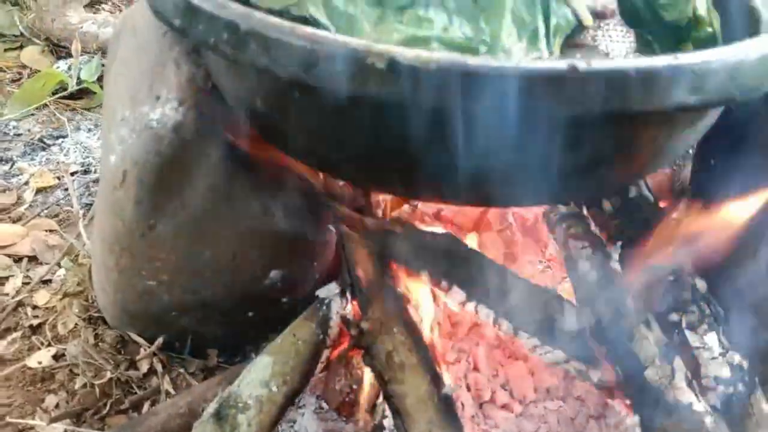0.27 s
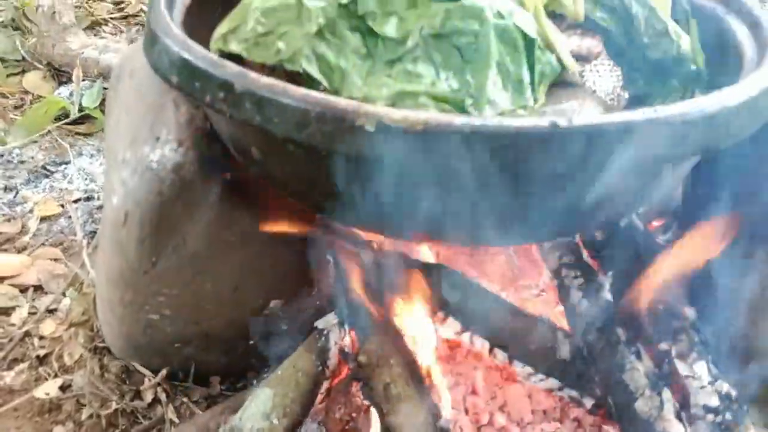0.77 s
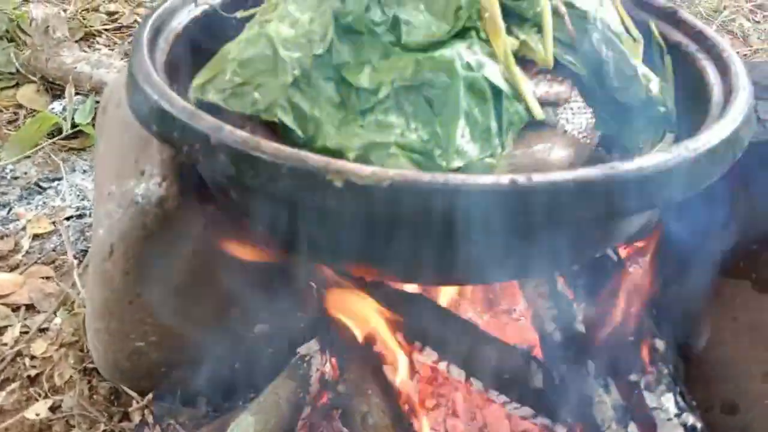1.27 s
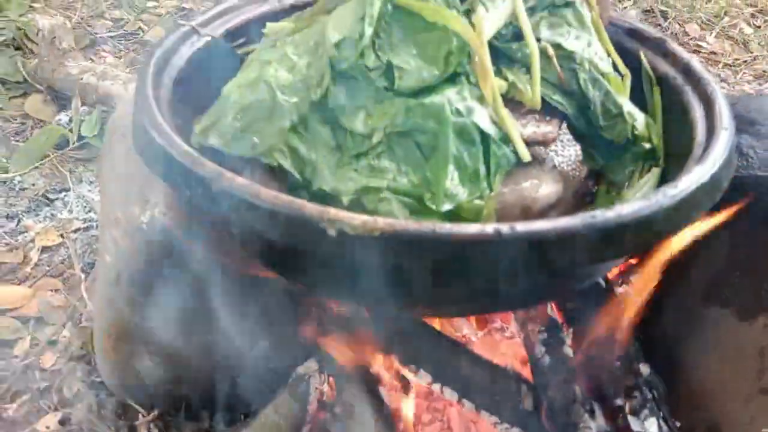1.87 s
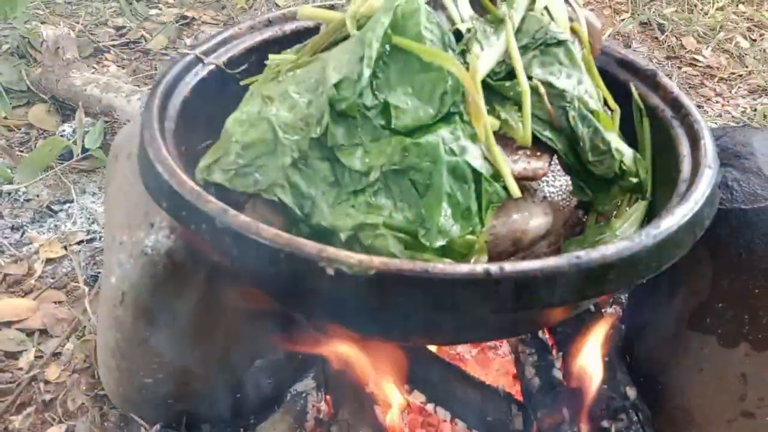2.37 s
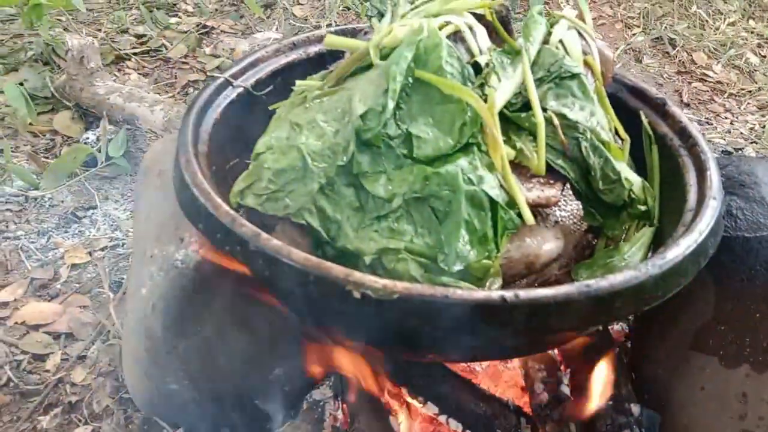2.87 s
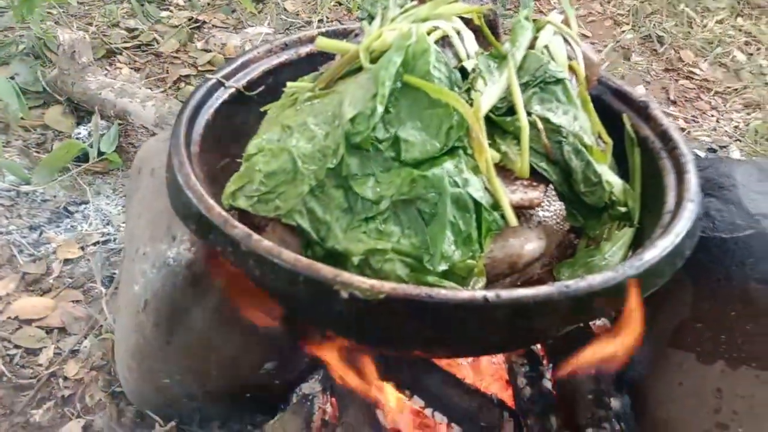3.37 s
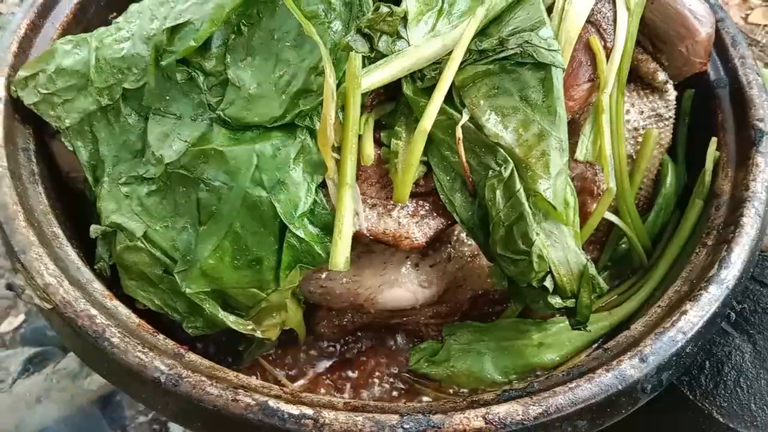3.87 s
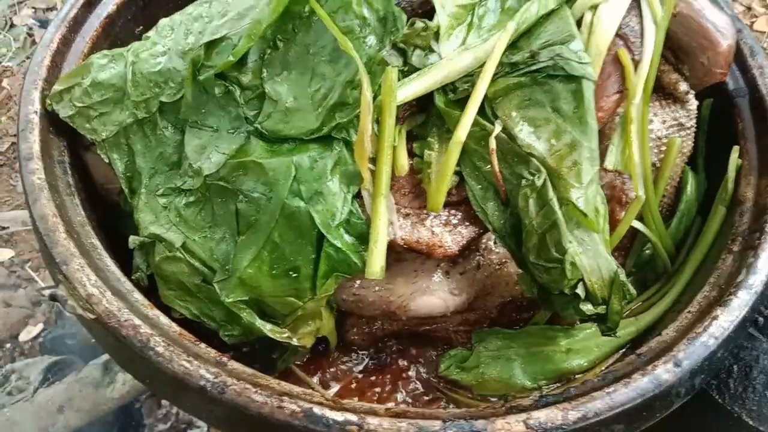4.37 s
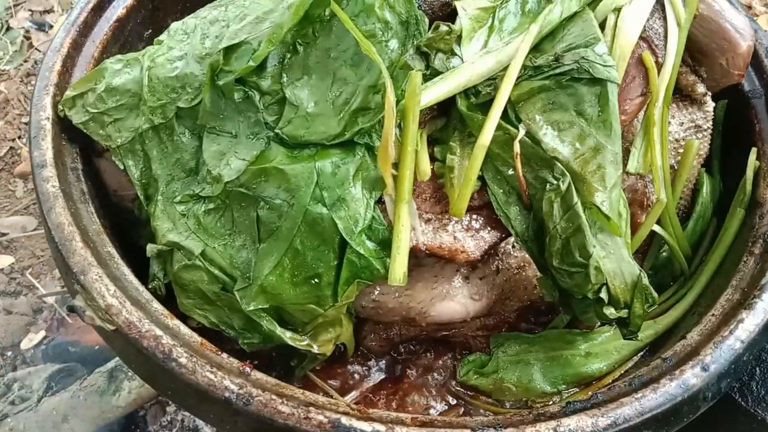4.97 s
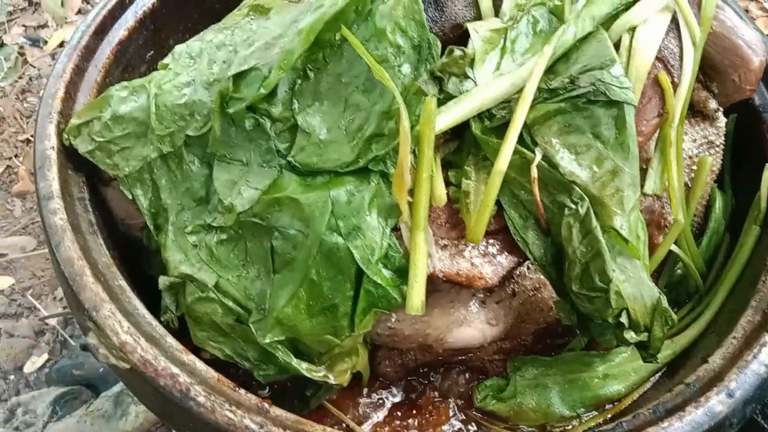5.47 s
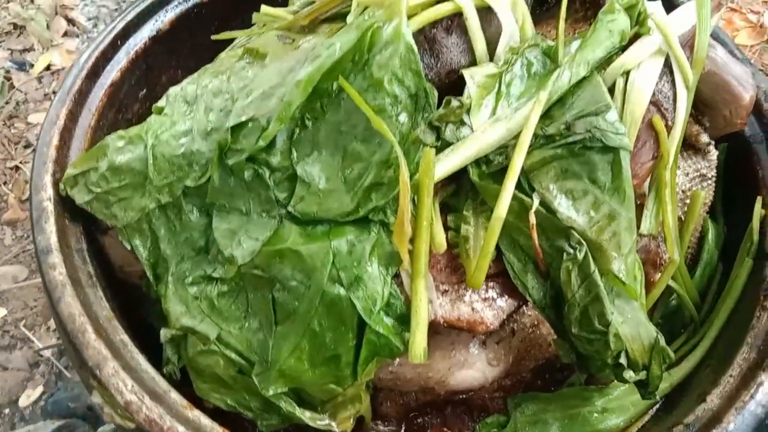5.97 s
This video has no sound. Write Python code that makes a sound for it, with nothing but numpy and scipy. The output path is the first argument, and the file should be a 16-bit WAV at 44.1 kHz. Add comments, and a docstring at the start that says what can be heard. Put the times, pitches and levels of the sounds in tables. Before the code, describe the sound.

A close microphone beside a pot on a wood fire picks up soft, resonant simmering, patchy frying hiss, tiny spits and an early dry snap. Low fire rumble swells gently. After about three and a half seconds there is a very short near-silence, then a quick fade into a stronger, steady boil and sizzle from above, with sharp cracks and wet pops in open air.

```python
"""Juice boils and fat sizzles around meat and greens in a clay pot on an outdoor wood fire.
Swarms of ringing bubbles make the boil; tiny droplet bursts over steam hiss make the sizzle.
Filtered noise gives flame rumble, a low drone and open air; short bursts give snaps, spurts, spits and gurgles.
First heard beside the pot, whose rim colours the boil, the sound breaks off for a moment.
It then fades back in from right above, louder and fuller."""
import sys
import numpy as np
from scipy import signal
from scipy.fft import rfft, irfft, next_fast_len
from scipy.io import wavfile
from scipy.ndimage import map_coordinates

SR = 44100
rng = np.random.default_rng(int(sys.argv[2]) if len(sys.argv) > 2 else 0)


def inscribe(sig):
    """Save sig as 16-bit PCM at rate SR to the path in sys.argv[1].

    A 1-D sig is mono; a 2-D sig holds one channel per row.
    Samples are clipped to [-1, 1] before scaling.
    """
    pcm = np.round(np.clip(np.atleast_2d(sig).T, -1, 1) * 32767)
    wavfile.write(sys.argv[1], SR, pcm.astype(np.int16))


N = 275184
SECONDS = np.arange(N) / SR

# Course of the heat beside the pot. Each row: time in seconds, boiling in dB, sizzling in dB, before trims.
HEAT_BESIDE = [(0.0, -52.5, -50.5), (0.42, -53.5, -51.5), (0.56, -52, -49.5), (1.08, -52, -50.5),
               (1.3, -50, -48.5), (1.66, -50.5, -48.5), (1.74, -51, -47), (1.9, -49, -47), (2.45, -49, -46),
               (2.7, -49.5, -45.5), (3.26, -48, -42.5), (3.36, -49, -48), (3.52, -49.5, -45)]
# The juice wells up beside the pot. Each row: centre in seconds, lift in dB, half-length in seconds.
WELLINGS = [(0.332, 2, 0.048), (0.653, 1, 0.063), (1.19, 2.5, 0.016), (1.527, 3, 0.011), (1.766, 2, 0.042),
            (2.566, 2.5, 0.035), (3.066, 2, 0.038)]
# Main pot resonances past the rim. Each row: centre in Hz, half-width in Hz, level in dB.
POT_RESONANCES = [(870, 126, 0.5), (1481, 108, -1), (1637, 122, -1.5), (1976, 147, -4.5), (2270, 114, -8)]
# Weak resonance that speaks now and then. Each row: centre in Hz, half-width in Hz, level in dB.
FITFUL_RESONANCE = [(1115, 175, 0)]
# High resonances rung by the smallest bubbles. Each row: centre in Hz, half-width in Hz, level in dB.
HIGH_RESONANCES = [(2470, 200, -6), (2820, 170, 0), (3290, 160, 0)]
# Bubbles of one size pause. Each row: centre in seconds, dip in dB, half-length in seconds, from Hz, to Hz.
LULLS = [(0.03, -5, .04, 300, 1000), (0.185, -7, 0.03, 300, 1500), (0.46, -6, 0.05, 1030, 1450),
         (0.692, -6, 0.03, 300, 1200), (0.9, -6, 0.055, 1030, 1450), (1.11, -4, 0.025, 300, 2300),
         (1.45, -4, .025, 300, 1400), (1.622, -8, 0.03, 300, 1400), (1.98, -5, .03, 1030, 1450),
         (2.345, -4, 0.018, 300, 1100), (2.41, -11, .045, 1030, 1420), (2.625, -6, .03, 1000, 1400),
         (2.8, -4, 0.07, 300, 1000), (3.29, -9, 0.026, 300, 1400), (4.963, -12, 0.034, 200, 680),
         (5.145, -12, 0.047, 200, 650), (5.555, -13, 0.037, 200, 620)]
# Colour of the fat heard beside the pot. Each row: frequency in Hz, relative density in dB per Hz.
FAT_BESIDE = [(1880, -24), (3200, -14), (3490, -12), (4280, -5), (4720, -12.5), (5380, -3.5), (6060, -5.5),
              (7340, 1.5), (7740, 3.5), (8710, -3), (9360, -11.5), (10600, -5.5), (11500, -10),
              (12700, -11), (13900, -22.5), (15400, -18.5)]
# Flame rumble beside the pot. Each row: time in seconds, level in dB.
FLAME_BESIDE = [(0.05, -81), (0.92, -75.5), (1.2, -74), (1.85, -74), (2.05, -76), (2.6, -75), (2.85, -70.5),
                (3.27, -66.5), (3.45, -78)]
# Flares heard from above. Each row: start in seconds, length in seconds, level in dB.
FLARES = [(3.89, 1.31, -55.5), (5.33, 0.11, -53.5), (5.53, 0.33, -56), (5.92, 0.25, -61)]
# Colour of the flames. Each row: frequency in Hz, relative density in dB per Hz.
FLAME_COLOUR = [(32, -33), (55, -23), (64, -11), (97, 4.5), (125, 4.5), (147, 0), (243, -20), (330, -42),
                (430, -26), (730, -120)]
# Swells of the low drone. Each row: start in seconds, length in seconds, level in dB before a 1 dB lift.
DRONE_SWELLS = [(0.72, 0.28, -79), (1.015, 0.55, -62.5), (1.57, 0.25, -68), (1.84, 0.092, -63.5),
                (2.08, 0.075, -67.5), (3.796, 0.36, -62), (4.19, 0.25, -75), (4.486, 0.76, -61.5),
                (5.352, 0.094, -69), (5.595, 0.58, -60)]
# Colour of the drone. Each row: frequency in Hz, relative density in dB per Hz.
DRONE_COLOUR = [(20, -32), (36, -24), (44.5, -2), (54, -16), (85, -13), (125, -25), (300, -69)]
# Colour of the outdoor air. Each row: frequency in Hz, relative density in dB per Hz.
AIR_COLOUR = [(30, -3), (120, 4.5), (300, 0.5), (600, -2.5), (2000, -27), (15000, -16)]
# Wood snaps. Each row: start in seconds, nominal level in dB, ring in Hz, ring and crack t60 in seconds,
# relative crack level in dB.
SNAPS = [(0.036, -47, 4400, 0.024, -2), (0.1526, -29.5, 3640, 0.0062, -13), (0.1526, -42, 2300, 0.005, -9),
         (1.584, -43, 4360, 0.0051, 2), (2.071, -52, 2450, 0.025, 7), (2.548, -37, 5600, 0.0055, -4.5),
         (4.8663, -19, 4320, 0.0086, -8), (4.8668, -21, 7460, 0.0068, -3), (4.8675, -22, 1600, 0.0045, -2),
         (4.8688, -23, 1770, 0.0054, 3), (5.086, -36, 2380, 0.012, 4), (5.345, -24, 6000, 0.005, -11),
         (5.37, -36, 1880, 0.016, 0), (6.035, -21.5, 1800, 0.0044, -3)]
# Juice flashes to steam. Each row: centre in seconds, level in dB, half-length in seconds.
SPURTS = [(0.036, -52, .008), (0.145, -52, .018), (0.335, -49.5, 0.04), (0.508, -59, .015),
          (0.58, -50.5, 0.016), (0.732, -42.5, 0.0075), (0.964, -60, .03), (1.225, -50, 0.044),
          (1.394, -49, .012), (1.525, -45.5, 0.011), (1.77, -51, 0.018), (2.026, -47, 0.037),
          (2.118, -47, 0.023), (2.362, -44.5, 0.03), (2.535, -46.5, 0.032), (2.7, -48, 0.011),
          (2.834, -49, 0.058), (3.22, -42.5, 0.024), (3.535, -46, 0.033), (4.48, -51, .01),
          (4.565, -49, 0.0087), (4.78, -41, 0.028), (5.167, -38, 0.022), (5.534, -36, 0.013),
          (5.712, -38, 0.012), (5.932, -36.5, 0.036)]
# Larger drops spit in the fat. Each row: start in seconds, nominal dB with the energy spread over one ms.
SPITS = [(0.153, -45), (0.2897, -42), (0.3102, -42), (0.4983, -49), (0.732, -45), (0.826, -48),
         (1.4716, -43), (1.5234, -47), (1.6062, -45), (1.7998, -42), (1.8588, -37), (2.1121, -41),
         (2.177, -40), (2.2687, -46), (2.3341, -38), (2.465, -37), (2.5037, -40), (2.5466, -38),
         (2.6898, -44), (2.9527, -46), (3.1966, -38), (3.2103, -35), (4.039, -27), (4.1304, -31),
         (4.4218, -24), (4.4788, -40), (4.5631, -34), (4.8676, -27), (5.0056, -28), (5.038, -34),
         (5.179, -27), (5.3438, -36), (5.7105, -28), (6.0492, -31)]
# Clusters of big bubbles. Each row: centre in seconds, relative level in dB, pitch in Hz, half-spread in seconds.
GURGLES = [(0.562, -54, 623, 0.031), (0.95, -52, 695, 0.02), (1.187, -54, 644, 0.017),
           (1.59, -58, 500, .015), (1.739, -40, 800, 0.024), (1.752, -40, 1200, 0.016),
           (2.111, -55, 537, 0.028), (2.465, -50.5, 557, 0.025), (2.70, -56, 680, 0.039),
           (2.888, -51, 650, .02), (2.983, -50.5, 600, 0.035), (3.43, -55, 586, 0.053),
           (4.408, -24, 1390, 0.0048), (4.411, -48.5, 380, 0.0084), (5.371, -29, 1430, 0.0079),
           (5.371, -38.5, 455, 0.0066), (5.402, -52, 334, 0.0184), (5.44, -43.5, 450, 0.035),
           (6.035, -45.5, 443, 0.0099)]
# Single blisters pop. Each row: start in seconds, nominal level in dB, starting pitch in Hz.
POPS = [(4.405, -17.5, 940), (5.238, -24, 1200), (5.3679, -20, 900), (5.372, -21, 1400)]
# Colour of the juice heard from above. Each row: frequency in Hz, relative density in dB per Hz.
JUICE_ABOVE = [(190, -65), (330, -33), (398, -25.5), (515, -2), (650, 1), (780, -2), (930, 2), (1090, 0.5),
               (1250, 2.5), (1390, -2), (1600, 2), (1780, -3), (1900, -3.5), (2190, -6), (2550, -17.5),
               (3320, -47), (5610, -120)]
# Colour of the fat heard from above. Each row: frequency in Hz, relative density in dB per Hz.
FAT_ABOVE = [(1880, -28.5), (3150, -17), (3600, -6.5), (4250, -7), (4430, -5.5), (4800, -14), (5420, -4.5),
             (6310, -6.5), (7650, 2), (8050, -0.5), (9300, -13), (10800, -8), (11500, -13.5), (12800, -13),
             (13900, -24.5), (15400, -21)]

BREAK_S, RETURN_S, TOP_HZ = 3.545, 3.595, 15530
GAP_DB = -93  # faint hiss under everything, including the break
BESIDE_BOIL_TRIM_DB, BESIDE_SIZZLE_TRIM_DB = 0.07, -0.88
WELLING_SIZZLE_SHARE = 0.31  # part of the welling lift that the sizzle follows
SIMMER_BRIGHT_DB = -13  # smallest bubbles against the rest, at the hardest boil
BRIGHTEN, BRIGHT_ABOVE_HZ = 0.52, 2000  # extra dB of upper resonances per dB of boiling
FITFUL_DB, FITFUL_SWING_DB, FITFUL_GROWS = -8.5, 2, 0.68  # level, random swing, extra dB per dB of boiling
WANDER_SHARE, WANDER_RATE = 0.0087, 5  # drift as a share of the pitch; random knots a second
FLARE_ATTACK_S, FLARE_RELEASE_S, FLAME_LULL_DB = 0.08, 0.056, -69.5
DRONE_ATTACK_S, DRONE_RELEASE_S, DRONE_LULL_DB = 0.04, 0.059, -100
SNAP_LOW_RATIO, SNAP_TOP_RATIO = 0.76, 1.3  # snap band around its ring, so low-ringing splinters sound duller
SPIT_T60_S, POP_CYCLES = 0.0071, 6.4
ABOVE_BOIL_DB, ABOVE_SIZZLE_DB = -39.5, -39.5  # base levels at the return
BOIL_RISE_DB_PER_S, SIZZLE_RISE_DB_PER_S = 0.21, 1.18
BOIL_RETURN_DB, BOIL_RETURN_S = -2, 0.45  # the boil comes back more slowly than the sizzle


def amp(db):
    """Decibels to gain."""
    return 10 ** (np.asarray(db) / 20)


def unit(x):
    """Scale to rms 1."""
    return x / np.sqrt(np.mean(x ** 2) + 1e-20)


def noise():
    """White noise for the whole scene."""
    return rng.standard_normal(N)


def curves(rows):
    """One value per sample for each column after the time."""
    s, *columns = np.transpose(rows)
    return [np.interp(SECONDS, s, column) for column in columns]


def bump(centre, length):
    """Bell-shaped swell that reaches 1 at its centre."""
    return np.exp(-((SECONDS - centre) / length) ** 2)


def wobble(rate):
    """Smooth random curve with rate knots a second."""
    at = np.arange(N) * rate / SR
    coarse = at[::16]
    knots = rng.standard_normal(int(at[-1]) + 4)
    return np.interp(at, coarse, map_coordinates(knots, [coarse]))


def highpassed(x, order, hz, sosfilter):
    """Keep what lies above hz, using the given filter routine."""
    return sosfilter(signal.butter(order, hz, "highpass", fs=SR, output="sos"), x)


def coloured(x, points):
    """Shape x with a causal (minimum-phase) filter through the (Hz, dB) points, at rms 1."""
    size = 16384
    hz, db = np.transpose(points)
    bins = np.fft.rfftfreq(size, 1 / SR)
    shape = amp(np.interp(np.log(bins + 1), np.log(hz + 1), db))
    cepstrum = irfft(np.log(np.maximum(shape, 1e-5)))[:size // 2]
    cepstrum[1:] *= 2
    response = irfft(np.exp(rfft(cepstrum, size)))[:size // 2]
    return unit(signal.oaconvolve(x, response)[:N])


def add(track, s, sound):
    """Mix a sound into the track at time s."""
    start = max(round(s * SR), 0)
    track[start:start + len(sound)] += sound[:N - start]


def bursts(rate, spread_db):
    """Tiny pops at random moments, of scattered size, at rms 1."""
    chance, size, sign = rng.random(N), rng.standard_normal(N), rng.choice([-1, 1], N)
    return unit((chance < rate / SR) * sign * amp(spread_db * np.minimum(size, 2.5)))


def bubble(t, hz, cycles, rise):
    """A bubble rings down 60 dB over some cycles; its pitch rises as it reaches the surface."""
    age = t * hz / cycles
    ring = np.sin(2 * np.pi * hz * t * (1 + rise * age))
    onset = 1 - np.exp(-2 * t * hz)
    return ring * amp(-60 * age) * onset


def boiling(rate, spread_db, cycles, froth_db):
    """A swarm of ringing bubbles on a froth of small pops."""
    count = int(rate * N / SR)
    when, pitch, size = rng.random((count, 3)).T
    t = np.arange(SR // 50) / SR
    hz = 520 * 5 ** pitch[:, None]
    rings = bubble(t, hz, cycles, rise=0.11) * hz * amp(spread_db * size[:, None])
    at = (when * N).astype(int)[:, None] + np.arange(len(t))
    swarm = unit(np.bincount(at.ravel(), rings.ravel(), N)[:N])
    return swarm + amp(froth_db) * bursts(rate=4000, spread_db=0.0)


def sizzling(rate, spread_db, steam_db, clump_db, flutter_db):
    """Droplets burst in the hot fat, in clumps, over a smooth hiss of steam."""
    droplets = bursts(rate, spread_db) * amp(clump_db * wobble(260))
    steam = amp(steam_db) * noise()
    return (droplets + steam) * amp(flutter_db * wobble(45))


def patchy(x, depth_db, rate, width_hz, fade_hz):
    """Like-sized bubbles come and go in pockets: narrow bands swell and fade, ever less above fade_hz."""
    hz, t, z = signal.stft(x, SR, nperseg=1024)
    knots = rng.standard_normal((240, 200))
    grid = np.meshgrid(hz / width_hz, t * rate, indexing="ij")
    field = map_coordinates(knots, grid, order=2, mode="mirror")
    swell = np.minimum(field, 1)  # lulls go deeper than swells go high
    gain = amp(depth_db * swell / (1 + (hz[:, None] / fade_hz) ** 4))
    gain /= np.sqrt(np.mean(gain ** 2, axis=1, keepdims=True))
    return signal.istft(z * gain, SR, nperseg=1024)[1][:N]


def hollow(modes):
    """Pot resonances as a (Hz, dB) shape with dark valleys between them."""
    hz = np.geomspace(100, 16000, 300)
    power = sum(amp(db) ** 2 / (1 + ((hz - centre) / width) ** 2) ** 3 for centre, width, db in modes)
    return np.c_[hz, 10 * np.log10(power + 1e-9)]


def wandering(x, share, rate):
    """The heaving juice detunes the resonances: pitch drifts at random by a small share."""
    at = np.arange(N) + np.cumsum(share * wobble(rate))
    return map_coordinates(x, [at], order=3, mode="mirror")


def lulled(x):
    """When bubbles of one size pause, their band of the boil drops away."""
    hz, _, z = signal.stft(x, SR, nperseg=512)
    t = np.arange(z.shape[1]) * 256 / SR

    def below(edge_hz):
        return 1 / (1 + (hz[:, None] / edge_hz) ** 16)

    dip_db = 0
    for s, db, length, low_hz, top_hz in LULLS:
        band = below(top_hz) - below(low_hz)
        dip_db = dip_db + db * np.exp(-((t - s) / length) ** 2) * band
    return signal.istft(z * amp(dip_db), SR, nperseg=512)[1][:N]


def juice_beside(boil_db):
    """Bubbles excite the pot's hollow resonances; a harder boil brightens them and feeds small bubbles."""
    harder_db = boil_db - boil_db.mean()
    juice = boiling(rate=440, spread_db=0.5, cycles=18.0, froth_db=11)
    juice = patchy(juice, depth_db=3.8, rate=14, width_hz=95, fade_hz=8000)
    fitful = patchy(bursts(rate=4000, spread_db=2), depth_db=4.5, rate=14, width_hz=100, fade_hz=8000)
    fitful_db = FITFUL_DB + FITFUL_GROWS * harder_db + FITFUL_SWING_DB * wobble(14)
    body = coloured(juice, hollow(POT_RESONANCES))
    body = body + amp(fitful_db) * coloured(fitful, hollow(FITFUL_RESONANCE))
    body = wandering(body, WANDER_SHARE, WANDER_RATE)
    upper = highpassed(body, 3, BRIGHT_ABOVE_HZ, signal.sosfiltfilt)
    body = body - upper + upper * amp(BRIGHTEN * harder_db)
    small = coloured(juice, hollow(HIGH_RESONANCES))
    small = patchy(small, depth_db=5.5, rate=12, width_hz=140, fade_hz=8000)
    small_db = SIMMER_BRIGHT_DB + 1.2 * (boil_db - boil_db.max())
    return lulled(body) + amp(small_db) * small


def fat_beside():
    """Fat droplets burst in patches, too small to sound low."""
    fat = sizzling(rate=4000, spread_db=4.5, steam_db=-1.0, clump_db=0.5, flutter_db=0.7)
    fat = patchy(fat, depth_db=7.5, rate=13, width_hz=160, fade_hz=5400)
    fat = patchy(fat, depth_db=1.1, rate=48, width_hz=1150, fade_hz=16000)
    return coloured(highpassed(fat, 6, 3150, signal.sosfilt), FAT_BESIDE)


def pot_beside():
    """From the side the bubbling is hollow; heat and wellings drive boil and sizzle in surges."""
    boil_db, sizzle_db = curves(HEAT_BESIDE)
    lift_db = sum(db * bump(s, length) for s, db, length in WELLINGS)
    boil_db = boil_db + lift_db
    sizzle_db = sizzle_db + WELLING_SIZZLE_SHARE * lift_db
    surge_db = 0.42 * wobble(18)  # juice and fat surge together
    boil = amp(boil_db + BESIDE_BOIL_TRIM_DB) * juice_beside(boil_db)
    sizzle = amp(sizzle_db + BESIDE_SIZZLE_TRIM_DB) * fat_beside()
    return amp(surge_db) * (boil + sizzle)


def swells(rows, attack_s, release_s, lull_db):
    """Gain that rises, holds and falls back to the lull for each (start, length, dB) row."""
    gain = amp(lull_db)
    for s, length, db in rows:
        rise, fall = (SECONDS - s) / attack_s, (s + length - SECONDS) / release_s
        gain = gain + amp(db) * np.clip(np.minimum(rise, fall) + 0.5, 0, 1)
    return gain


def flames():
    """Fluttering low noise follows the draught, faint from the side and flaring from above."""
    side_db, = curves(FLAME_BESIDE)
    flaring = swells(FLARES, FLARE_ATTACK_S, FLARE_RELEASE_S, FLAME_LULL_DB)
    draught = np.where(SECONDS < RETURN_S, amp(side_db), flaring)
    return draught * unit(coloured(noise(), FLAME_COLOUR) * amp(0.88 * wobble(16)))


def drone():
    """Low filtered noise comes and goes in swells."""
    level = swells(DRONE_SWELLS, DRONE_ATTACK_S, DRONE_RELEASE_S, DRONE_LULL_DB)
    return amp(1.0) * level * coloured(noise(), DRONE_COLOUR)


def outdoor_air(level_db):
    """Steady filtered noise for the open air."""
    return amp(level_db) * coloured(noise(), AIR_COLOUR)


def snaps():
    """Wood splits in the heat: a dry noise crack and a very short ring."""
    out, t = np.zeros(N), np.arange(SR // 25) / SR
    for s, db, hz, t60, crack_db in SNAPS:
        band = [SNAP_LOW_RATIO * hz, min(SNAP_TOP_RATIO * hz, 11000)]
        dry_wood = signal.butter(2, band, "bandpass", fs=SR, output="sos")
        ring = np.sin(2 * np.pi * hz * t)
        crack = 1.9 * amp(crack_db) * rng.standard_normal(len(t))
        envelope = amp(db + 2.5 - 60 * t / t60) * (1 - np.exp(-t / 0.00024))
        add(out, s, signal.sosfilt(dry_wood, envelope * (ring + crack)))
    return out


def spurts():
    """Juice runs onto hot clay and flashes to steam: brief swells of dense pops."""
    swell = sum(amp(db) * bump(s, length) for s, db, length in SPURTS)
    return swell * coloured(bursts(rate=5400, spread_db=0.5), FAT_BESIDE)


def spits():
    """A larger drop bursts in the fat with a sharp, decaying noise tick."""
    out, t = np.zeros(N), np.arange(SR // 80) / SR
    for s, db in SPITS:
        tick = rng.standard_normal(len(t)) * amp(-60 * t / SPIT_T60_S)
        tick *= np.sqrt(SR / 1000 / np.sum(tick ** 2))  # same energy as one millisecond at rms 1
        add(out, s, amp(db) * tick)
    return out.std() * coloured(out, FAT_BESIDE)


def gurgles():
    """A handful of large bubbles break together, or a single blister bursts with a dull pop."""
    out, t = np.zeros(N), np.arange(SR // 20) / SR
    for s, db, hz, length in GURGLES:
        for delay, detune in rng.uniform(-1, 1, size=(8, 2)):
            note = bubble(t, hz * (1 + 0.15 * detune), cycles=24.0, rise=0.065)
            add(out, s + length * delay, amp(db - 6.5) * note)
    for s, db, hz in POPS:
        add(out, s, amp(db) * bubble(t, hz, POP_CYCLES, rise=0.09))
    return out


def juice_above():
    """The open surface boils dense and even; mainly the biggest bubbles come and go."""
    juice = boiling(rate=550, spread_db=1, cycles=18.0, froth_db=15.5)
    juice = patchy(juice, depth_db=2.8, rate=16, width_hz=130, fade_hz=1500)
    small = amp(-15.5) * coloured(bursts(rate=3300, spread_db=8.0), hollow(HIGH_RESONANCES))
    return lulled(coloured(juice, JUICE_ABOVE)) + small


def fat_above():
    """Droplets burst in the fat, denser and more even from above."""
    fat = sizzling(rate=4500, spread_db=1.0, steam_db=-2.5, clump_db=1.0, flutter_db=0.7)
    fat = patchy(fat, depth_db=1.5, rate=25, width_hz=704, fade_hz=16000)
    return coloured(fat, FAT_ABOVE)


def pot_above():
    """From above juice and fat are heard directly, both slowly growing."""
    since = SECONDS - RETURN_S
    surge_db = 0.15 * wobble(9.6)
    boil_db = ABOVE_BOIL_DB + BOIL_RISE_DB_PER_S * since + surge_db
    boil_db = boil_db + BOIL_RETURN_DB * bump(RETURN_S, BOIL_RETURN_S)
    sizzle_db = ABOVE_SIZZLE_DB + SIZZLE_RISE_DB_PER_S * since + surge_db
    return amp(boil_db) * juice_above() + amp(sizzle_db) * fat_above()


def scene():
    """Beside the pot, a short near-silence, then a fade-in above it."""
    # at the break the sound drops at once, then dies to almost nothing
    remnant = amp(-24.5 - 650 * np.abs(SECONDS - BREAK_S)) + amp(-54)
    beside = np.where(SECONDS < BREAK_S, 1, remnant * (SECONDS < RETURN_S + 0.02))
    above = np.clip((SECONDS - RETURN_S) / 0.21, 0, 1) ** 1.14
    around = flames() + drone() + outdoor_air(-73.5) + snaps() + spurts() + spits() + gurgles()
    heard = beside * (pot_beside() + around) + above * (pot_above() + around)
    return (heard + outdoor_air(GAP_DB))[None]


def record(dry):
    """Nothing is kept above the band limit."""
    m = next_fast_len(N + SR // 4)
    kept = np.fft.rfftfreq(m, 1 / SR) < TOP_HZ
    return irfft(rfft(dry, m) * kept, m)[:, :N]


dry = scene()
out = record(dry)
inscribe(out)
```